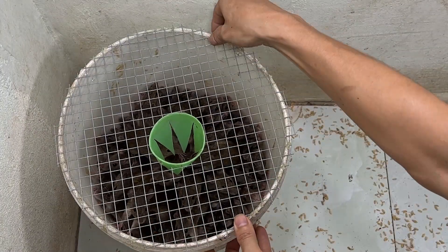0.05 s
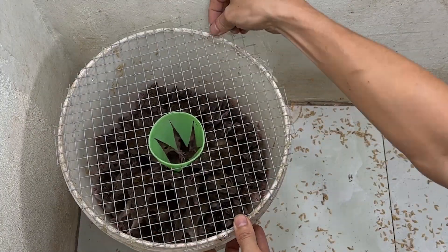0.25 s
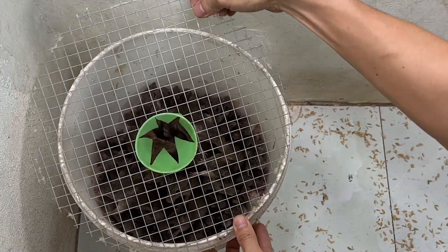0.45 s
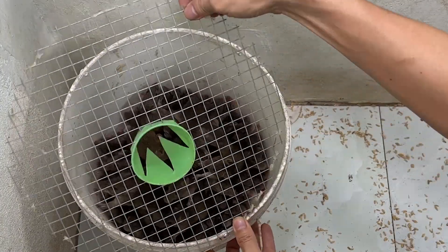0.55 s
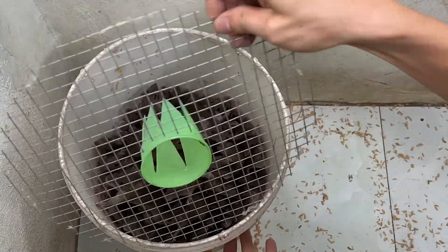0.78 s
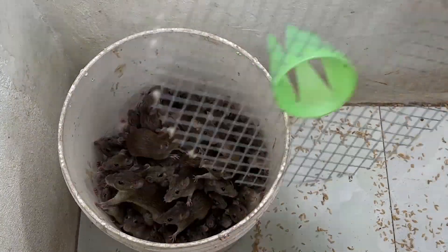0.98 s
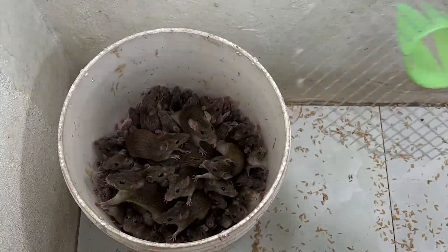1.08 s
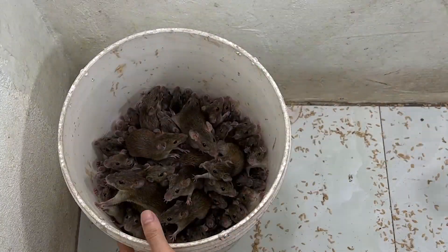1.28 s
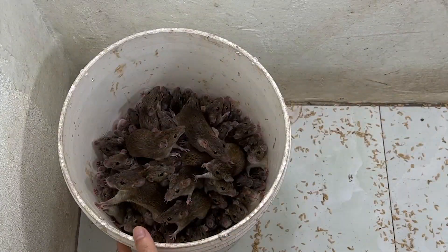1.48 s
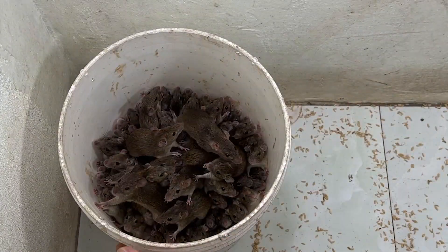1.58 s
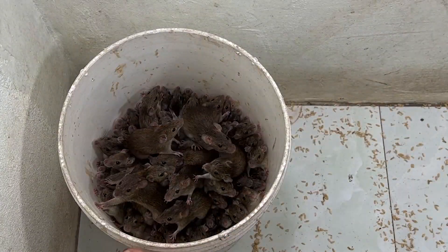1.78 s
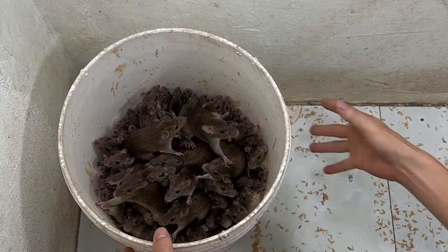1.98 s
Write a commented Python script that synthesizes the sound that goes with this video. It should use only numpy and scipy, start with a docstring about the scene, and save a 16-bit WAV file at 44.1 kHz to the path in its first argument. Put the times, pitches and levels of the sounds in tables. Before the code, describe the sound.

A wire mesh lid is dragged off a plastic bucket with a loud, close rattle, then clatters down further away. Mice scuffle faintly under a low hum and a thin, shrill hiss in a hard-walled room.

```python
"""Mesh lid off a bucket of mice

In a hard-walled room a wire mesh lid is dragged off a plastic bucket. Its wires snag on the rim and
snap free, drumming the bucket. The lid lifts away with a few light brushes and clatters down further
off; the bucket is bumped. Mice scuffle faintly under a low hum and a shrill, insect-like hiss."""
import sys
import numpy as np
from scipy import signal
from scipy.fft import rfft, irfft
from scipy.io import wavfile
from scipy.ndimage import uniform_filter1d

SR = 44100
rng = np.random.default_rng(int(sys.argv[2]) if len(sys.argv) > 2 else 0)


def inscribe(sig):
    """Save sig as 16-bit PCM at rate SR to the path in sys.argv[1].

    A 1-D sig is mono; a 2-D sig holds one channel per row.
    Samples are clipped to [-1, 1] before scaling.
    """
    pcm = np.round(np.clip(np.atleast_2d(sig).T, -1, 1) * 32767)
    wavfile.write(sys.argv[1], SR, pcm.astype(np.int16))


N = 90404

# bright tone of a wire tick: f/Hz, level/dB
TICK_COLOUR = [(1000, -27), (3500, -7), (5500, -5), (8300, 3.5), (11500, -0.5), (16000, -4.5)]


def amp(db):
    """Decibels to gain."""
    return 10 ** (np.asarray(db) / 20)


def unit(x):
    """Scales to rms 1."""
    return x / np.sqrt(np.mean(x ** 2) + 1e-20)


def read(points, hz):
    """Reads a curve on a log-frequency axis."""
    f, value = np.transpose(points)
    return np.interp(np.log(hz + 1), np.log(f + 1), value)


def fader(points):
    """A gain ride through points of t/s, level/dB."""
    return amp(np.interp(np.arange(N) / SR, *np.transpose(points)))


def add(mix, s, sound):
    """Drops a sound into the mix at s seconds."""
    part = mix[round(s * SR):][:len(sound)]
    part += sound[:len(part)]


def convolve(x, response):
    """Passes a signal through one or two responses."""
    return signal.fftconvolve(np.atleast_2d(x), np.atleast_2d(response), axes=1)[:, :N]


def eq(gain_db, size=4096):
    """Minimum-phase response of a gain given as a function of frequency."""
    hz = abs(np.fft.fftfreq(size, 1 / SR))
    log_gain = np.log(amp(np.maximum(gain_db(hz), -100)))
    return np.fft.ifft(np.exp(np.conj(signal.hilbert(log_gain)))).real[:size // 2]


def colour(x, points):
    """Gives clicks a tone colour and keeps their energy."""
    response = eq(lambda hz: read(points, hz))
    return convolve(x, response / np.linalg.norm(response))


def pan(left_db):
    """Stereo gains: left up, right down by as much."""
    return amp([[left_db], [-left_db]])


def from_left(pair, lag_s=0.000014):
    """Sound from the left reaches the right channel a moment later."""
    delay = np.exp(-2j * np.pi * np.fft.rfftfreq(N, 1 / SR) * lag_s)
    return np.array([pair[0], irfft(rfft(pair[-1]) * delay, N)])


def stereo_noise(size, mono_below_hz=210):
    """White noise, wide on top and centred in the bass."""
    mid, side = rfft(rng.standard_normal((2, size)))
    hz = np.fft.rfftfreq(size, 1 / SR)
    width = np.pi / 4 * (1 - 1 / (1 + (hz / mono_below_hz) ** 2))
    mid, side = mid * np.cos(width), side * np.sin(width)
    return irfft([mid + side, mid - side], size)


def clicks(per_s, spread_db):
    """Random tiny contacts of uneven size."""
    size = amp(spread_db * np.minimum(rng.exponential(1, N), 4))
    return unit(size * rng.choice([-1, 1], N) * (rng.random(N) < per_s / SR))


def blows(rows):
    """Each hit (t/s, level/dB, decay/s) is a first contact followed by a dying chatter."""
    force, t = np.zeros(N), np.arange(SR // 10) / SR
    for s, db, decay in rows:
        burst = clicks(per_s=6000, spread_db=2.5)[:len(t)] * np.exp(-t / decay)
        burst[0] = 2.1  # first contact
        add(force, s, amp(db) * burst / np.linalg.norm(burst) * np.sqrt(decay * SR / 2))
    return force


def impulse(s, db, decay):
    """One clean hit with the energy of a chattering blow."""
    force = np.zeros(N)
    add(force, s, amp([db]) * np.sqrt(decay * SR / 2))
    return force


def ringing(force, modes):
    """A struck body rings in decaying sines, scaled together to unit energy."""
    t = np.arange(SR) / SR
    ring = sum(amp(db) * np.exp(-np.log(1000) * t / t60) * np.sin(2 * np.pi * hz * t)
               for hz, db, t60 in modes)
    return convolve(force, ring / np.linalg.norm(ring))


def dense_ring(force, t60):
    """Many close, quickly dying modes, played as noise that fades after each hit."""
    keep = np.exp(-2 * np.log(1000) / t60 / SR)
    energy = signal.lfilter([1 - keep], [1, -keep], force ** 2)
    return np.sqrt(energy) * stereo_noise(N)


def room(x, build_s=0.00071):
    """Hard walls return a diffuse tail of even spectrum, each band dying at its own speed."""
    # reverb time: f/Hz, t60/s
    decay_times = [(60, 0.46), (150, 0.82), (300, 0.86), (1000, 0.54), (2500, 0.57), (5000, 0.39),
                   (9000, 0.31), (16000, 0.25)]
    hz, t, bands = signal.stft(stereo_noise(SR), SR, nperseg=256)
    t60 = read(decay_times, hz)[:, None]
    bands = bands * np.exp(-np.log(1000) * t / t60) * (1 - np.exp(-t / build_s)) / np.sqrt(t60)
    spectrum = rfft(signal.istft(bands, SR, nperseg=256)[1])
    local_power = uniform_filter1d(abs(spectrum) ** 2, size=24, axis=1)
    tail = irfft(spectrum / np.sqrt(local_power + 1e-12))[:, :SR * 3 // 4]
    return convolve(x, tail / np.linalg.norm(tail[0]))


def background():
    """The bed: room tone, a rumble that swells late, a low hum and a shrill hiss with narrow peaks."""
    # tone of the room air: f/Hz, level/dB
    air_colour = [(20, -11), (35, -7), (48, -9), (62, -19), (82, -6), (115, -4.5), (170, -6), (300, -18),
                  (600, -23.5), (1200, -28), (2500, -41), (4200, -76), (9000, -44), (16000, -46)]
    # tone of the rumble: f/Hz, level/dB
    rumble_colour = [(20, -22), (50, -6), (80, 12.5), (115, -5), (160, -3), (260, -13.5), (800, -46)]
    # swell of the rumble: t/s, level/dB
    rumble_ride = [(0, -47.5), (1.35, -47.5), (1.55, -41), (1.8, -38), (2.05, -39)]
    # steady sines of the hum: f/Hz, level/dB
    hum_tones = [(48.4, -51), (80.7, -52), (156.1, -56.5)]
    # tone of the hiss: f/Hz, level/dB
    hiss_colour = [(3500, -77), (4700, -11), (5400, -4), (6300, 0), (6900, 3), (7600, -6.5), (9000, -17),
                   (12000, -91)]
    # whistling peaks in the hiss: f/Hz, half-width/Hz, level/dB
    hiss_peaks = [(5508, 36, -51.5), (5760, 29, -61), (6116, 130, -49.5), (6470, 21, -48.5),
                  (6860, 24, -60.5)]
    hz, t = np.fft.rfftfreq(N, 1 / SR), np.arange(N) / SR
    noise = lambda gain: unit(irfft(rfft(stereo_noise(N)) * gain, N))
    hum = sum(amp(db) * np.sqrt(2) * np.sin(2 * np.pi * (f * t + rng.random())) for f, db in hum_tones)
    hiss = amp(-46.5) * noise(amp(read(hiss_colour, hz)))
    hiss += sum(amp(db) * noise(1 / (1 + ((hz - f) / width) ** 2)) for f, width, db in hiss_peaks)
    rumble = fader(rumble_ride) * noise(amp(read(rumble_colour, hz)))
    air = amp(-51) * noise(amp(read(air_colour, hz)))
    return air + rumble + hum + pan(left_db=3.5) * hiss


def mice():
    """Tiny scratches of claws and fur, clearer once the lid is off."""
    # rise of the scuffling: t/s, level/dB
    scuffle_ride = [(0, -74), (0.9, -58.5), (1.2, -53.5), (1.33, -56), (1.44, -53), (2.05, -46)]
    # tone of the scuffling: f/Hz, level/dB
    scuffle_colour = [(150, -3.5), (500, 7), (1500, -2.5), (3500, -8), (7000, -8), (15000, -20.5)]
    scratches = clicks(per_s=500, spread_db=0.5) * fader(scuffle_ride)
    return colour(dense_ring(scratches, t60=0.066), scuffle_colour)


def bumps():
    """The bucket wall swings for a few cycles at each thump, with a dull chatter."""
    # thumps of the wall: t/s, level/dB, f/Hz, swell/s
    thumps = [(0.2600, -13, 254, 0.0038), (0.2750, -20, 105, 0.011), (0.3050, -19, 104, 0.0067),
              (0.321, -12, 265, 0.0038), (0.3680, -19, 130, .006), (0.374, -11, 377, 0.0029),
              (0.4070, -17.5, 204.3, 0.0071), (0.4170, -15, 290, 0.0018), (0.4530, -18, 184, 0.00406),
              (1.821, -22, 158, 0.0046), (1.837, -29, 91.5, 0.0077), (1.8620, -29, 192, 0.0055),
              (1.8810, -27.5, 105, 0.005)]
    # tone of their chatter: f/Hz, level/dB
    chatter_colour = [(40, -35), (100, -24.5), (190, 2.5), (320, -5.5), (500, -6), (900, -19), (3000, -30)]
    swing, t = np.zeros(N), np.arange(SR // 5) / SR
    for s, db, hz, swell in thumps:
        add(swing, s, amp(db) * t / swell * np.exp(1 - t / swell) * np.sin(2 * np.pi * hz * t))
    chatter = blows([(s, db, 2 * swell) for s, db, _, swell in thumps])
    thud = swing + amp(-8) * colour(chatter, chatter_colour)
    return thud + amp(-15) * room(thud)


def lid_landing():
    """The mesh lands in a roomy clatter and rings as it bounces free, flexed differently each time."""
    # the mesh springs clear of the rim, then bounces further off:
    # t/s, clatter/dB, sparkle/dB, decay/s, ring over clatter/dB, pitch ratio from flexing
    hits = [(0.76, -43, -64, 0.0071, 11, .54), (1.4557, -24, -26.5, 0.0061, 0.5, 0.98),
            (1.677, -29, -32, 0.013, -16, 1.1), (1.692, -25, -34, 0.0039, -2, 1.14),
            (1.715, -29.5, -36, 0.0088, -2, 1), (1.732, -41, -52, 0.0096, 6, 1.22),
            (1.764, -34.5, -55, 0.0066, 3.5, .94), (1.837, -25.5, -50, 0.0078, -7, 1.14),
            (1.856, -38.5, -60, 0.01, 2, 1.24)]
    # tone of the clatter: f/Hz, level/dB
    clatter_colour = [(100, 0.5), (400, -5), (850, 0.5), (1300, 0.5), (2300, 3.5), (3000, -2), (3900, -5.5),
                      (6000, -7.5), (8500, -10.5), (12000, -18.5), (16000, -29)]
    # free ring of the mesh: f/Hz, level/dB, t60/s
    mesh_modes = [(754, -7, .24), (889, -6, 0.17), (1677, -2, 0.14), (2024, -8, 0.3), (2288, 4, 0.3),
                  (2347, 2, 0.36), (2890, -12, 0.3)]
    force = blows([(s, db, decay) for s, db, _, decay, _, _ in hits])
    sparkle = colour(blows([(s, db, decay) for s, _, db, decay, _, _ in hits]), TICK_COLOUR)
    ring = np.zeros((1, N))
    for s, db, _, decay, ring_db, flex in hits:
        flexed_modes = [(hz * flex, level, t60) for hz, level, t60 in mesh_modes]
        ring += ringing(impulse(s, db + ring_db, decay), flexed_modes)
    clatter = sparkle + colour(force + amp(2.5) * dense_ring(force, t60=0.061), clatter_colour)
    direct = from_left(amp(-5.5) * clatter + ring)
    reverb = amp(1) * room(clatter + amp(-11.5) * ring)
    return pan(left_db=0.5) * (direct + reverb)


def bucket(force):
    """Knocks on the rim drum the plastic wall and ring its modes."""
    # hollow tone of the plastic: f/Hz, level/dB
    knock_colour = [(30, -77), (70, -42.5), (150, -10.5), (240, 3), (330, 1), (450, 0), (560, -5),
                    (800, -3.5), (1250, -6.5), (1900, -16.5), (4000, -22), (10000, -59)]
    # bucket and mesh ringing together: f/Hz, level/dB, t60/s
    body_modes = [(89, -16, .3), (120, -2, .5), (156, -9, 1.0), (191, -4, .3), (243, -2, .32),
                  (329, -1, .35), (370, -3, .4), (437, -5, .4), (651, -6, .3), (768, -5, .22),
                  (843, -7, .22), (888, -5, .22), (1090, -5, .25), (1198, -3, .25), (1305, -3, .27)]
    wall = force + dense_ring(force, t60=0.08)
    knock = colour(wall, knock_colour)
    return pan(left_db=0.5) * (knock + amp(-5.5) * ringing(wall, body_modes) + amp(-7) * room(knock))


def wires(force, ticks):
    """The sharp ticks and bright snap of the mesh and its duller ring, a little to the left."""
    # metallic tone of the wires: f/Hz, level/dB
    wire_colour = [(100, -45), (250, -34), (500, -5), (1200, 4), (2200, 2.5), (3500, 0), (4800, 7.5),
                   (6300, 4), (8200, 5), (12000, -4.5), (16000, -6)]
    # tilt that leaves ring and reflections duller than the snap: f/Hz, gain/dB
    dulling = [(2000, 4.5), (6000, 1), (9000, -1.5), (13000, -1)]
    # pan by band, added on the left and taken off the right: f/Hz, gain/dB
    lean = [(1000, -3.5), (2800, 3), (5500, 2.5), (8500, 0), (16000, 1.5)]
    snap = colour(force, wire_colour) + colour(ticks, TICK_COLOUR)
    ring = amp(-2.5) * colour(dense_ring(force, t60=0.038), wire_colour)
    reverb = amp(-6.5) * room(snap + ring)
    diffuse = convolve(ring + reverb, eq(lambda hz: read(dulling, hz)))
    pan_eq = [eq(lambda hz: side * read(lean, hz)) for side in (1, -1)]
    return from_left(convolve(snap + diffuse, pan_eq))


def lid_pull():
    """The mesh snags and slides over the rim, exciting both the wires and the bucket."""
    # wires snapping over the rim: t/s, tick/dB, wire chatter/dB, bucket knock/dB, chatter decay/s
    snags = [(0.1912, -22.5, -35, -29, 0.0053), (0.215, -13, -17, -17, 0.0036),
             (0.2252, -8.5, -18, -19.5, 0.0043), (0.2535, -10.5, -9.5, -17.5, 0.0039),
             (0.2614, -13, -16.5, -8.5, 0.0042), (0.2864, -28, -24, -11, 0.0016),
             (0.3069, -9.5, -21.5, -14, 0.01), (0.3312, -3, -12.5, -6.5, 0.0047),
             (0.3661, -9.5, -14, -12.5, 0.0024), (0.3695, -30, -13.5, -10, 0.0061),
             (0.3738, 1, -12.5, -8, 0.0031), (0.3810, -33, -7.5, -6, 0.0011),
             (0.389, -25, -16, -9.5, 0.003), (0.396, -21, -17, -13.5, 0.0043),
             (0.4067, -20, -21.5, -8.5, 0.0046), (0.413, -38, -26, -13.5, 0.0021),
             (0.6144, -38, -28.5, -20, 0.0013), (0.722, -35, -41, -27, 0.00082),
             (1.0832, -35, -43, -46, 0.014)]
    # scrape between snags, then light brushes: t/s, relative level/dB
    slide_ride = [(0.179, -46.5), (0.228, -20), (0.27, -15.5), (0.35, -14), (0.41, -18), (0.439, -24),
                  (0.53, -57), (0.579, -41), (0.69, -44), (0.73, -32.5), (0.792, -33), (0.831, -59),
                  (1.02, -48), (1.09, -40), (1.16, -37.5), (1.208, -61)]
    tick_decay_s = 0.0006
    slide = clicks(per_s=900, spread_db=4.5) * fader(slide_ride)
    ticks = blows([(s, db, tick_decay_s) for s, db, _, _, _ in snags])
    snaps = blows([(s, db, decay) for s, _, db, _, decay in snags])
    knocks = blows([(s, db, decay) for s, _, _, db, decay in snags])
    return wires(snaps + amp(-20) * slide, ticks) + bucket(knocks + amp(-9.5) * slide)


def scene():
    """Lid, bucket and mice over the bed of hum and hiss."""
    return lid_pull() + lid_landing() + bumps() + background() + mice()


def record(dry):
    """Peaks are rounded, the high treble has two narrow dips, and the very top is cut."""
    # two narrow dips in the high treble, near 10.4 and 13.9 kHz: f/Hz, width/Hz, gain/dB
    dips = [(10350, 620, -23), (13850, 520, -23)]
    ceiling, cutoff_hz = 1.15, 15800
    rounded = ceiling * np.tanh(dry / ceiling)
    treble_dips = eq(lambda hz: sum(db * np.exp(-((hz - f) / width) ** 2) for f, width, db in dips))
    lowpass = signal.firwin(255, cutoff_hz, window=("kaiser", 8), fs=SR)
    return signal.oaconvolve(convolve(rounded, treble_dips), lowpass[None], "same")


dry = scene()
out = record(dry)
inscribe(out)
```